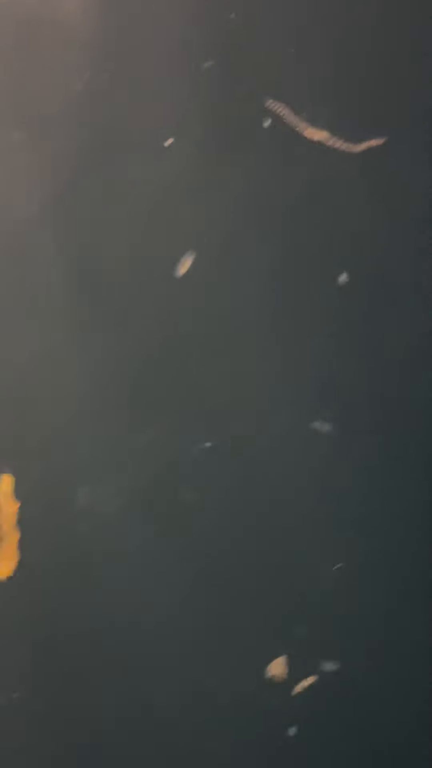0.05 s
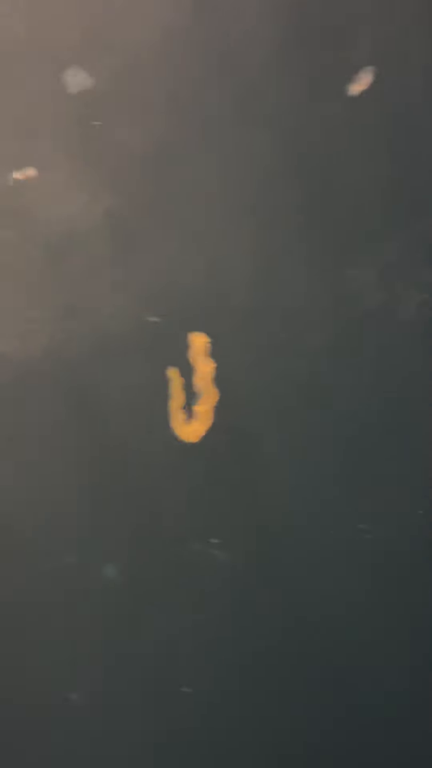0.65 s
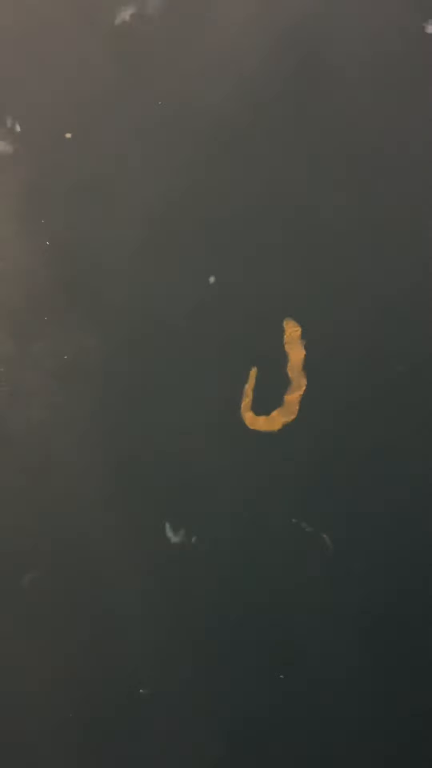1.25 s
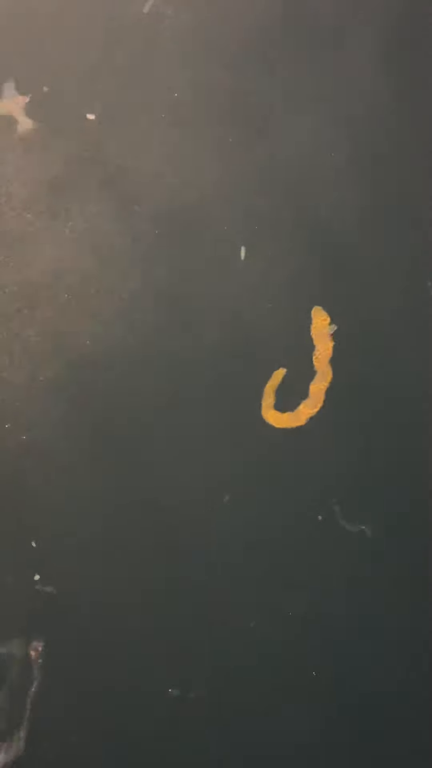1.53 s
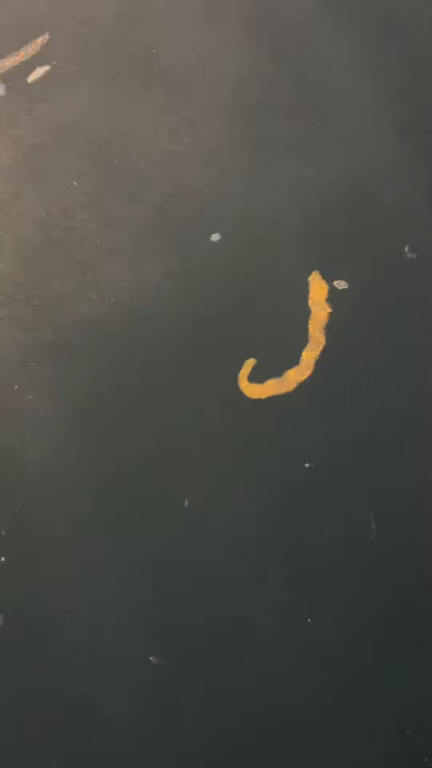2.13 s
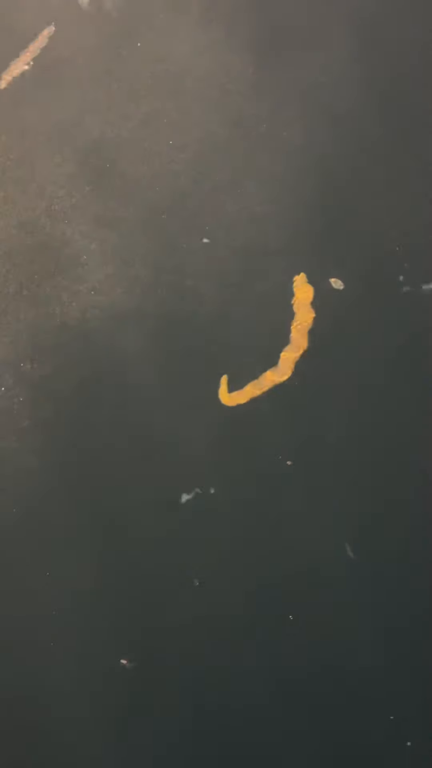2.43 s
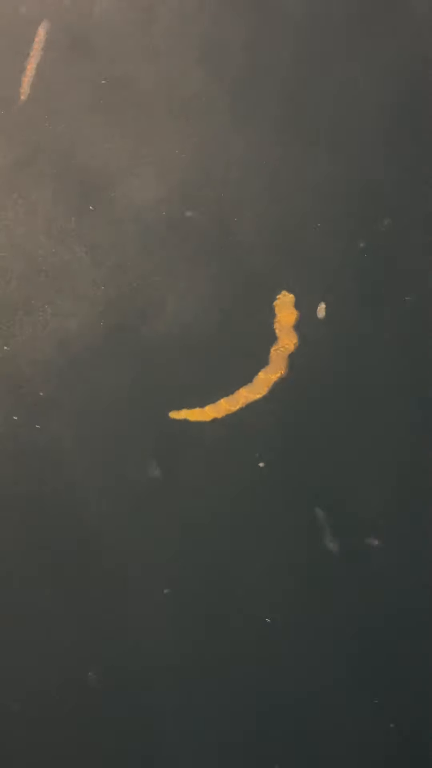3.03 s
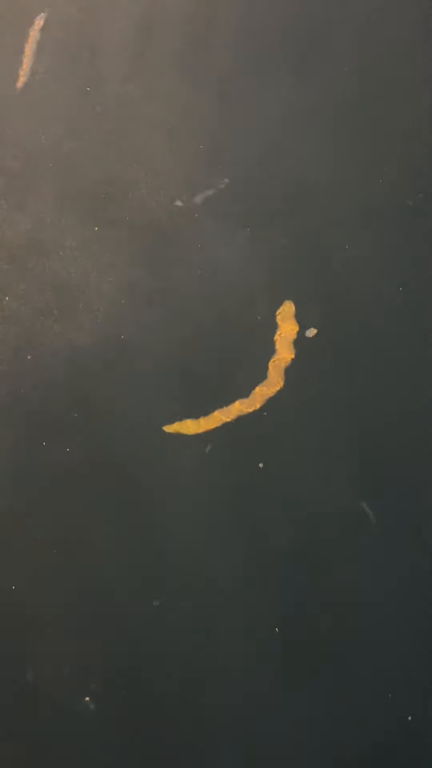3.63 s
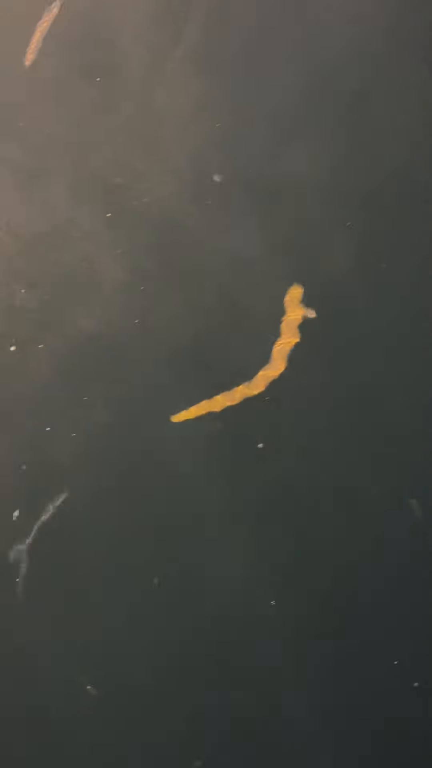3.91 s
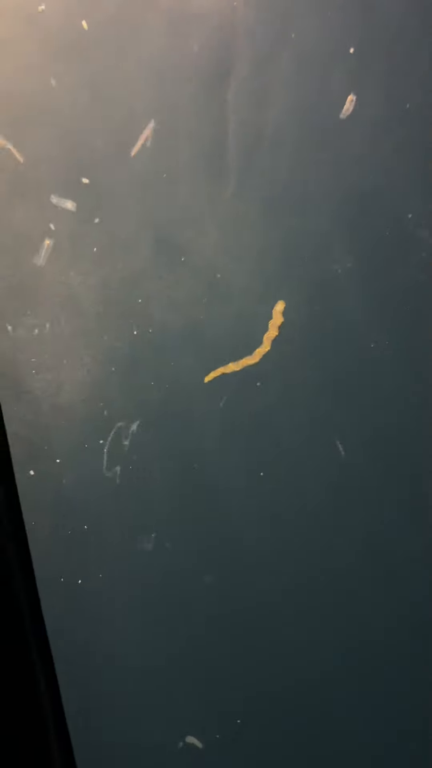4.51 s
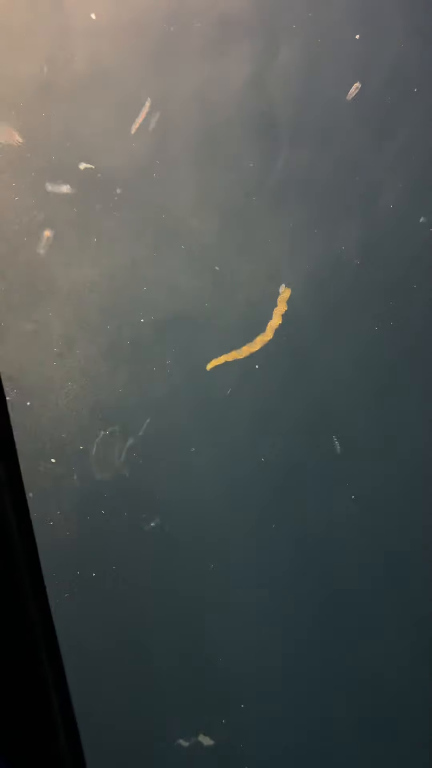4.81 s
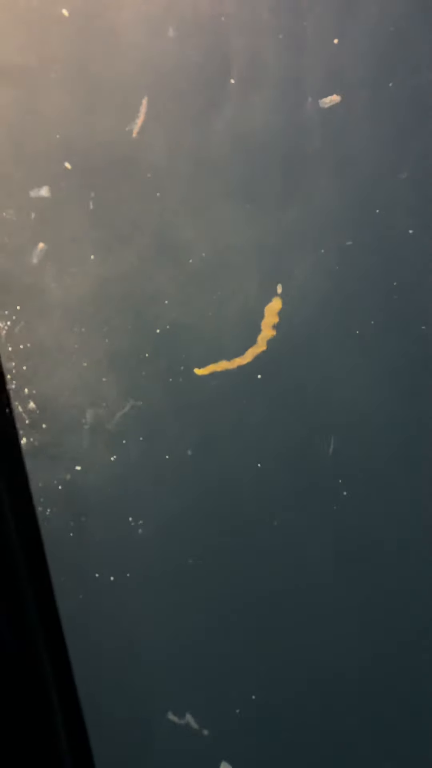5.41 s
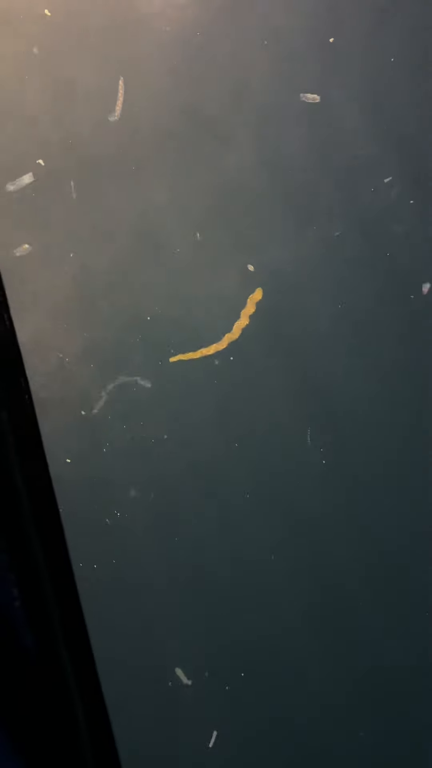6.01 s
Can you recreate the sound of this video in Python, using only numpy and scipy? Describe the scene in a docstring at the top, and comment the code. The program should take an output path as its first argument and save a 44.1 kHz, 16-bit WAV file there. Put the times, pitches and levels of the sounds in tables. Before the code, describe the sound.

The sound is heard underwater, from a microphone hanging beside a boat. A low, steady generator hum and a deep water rumble run throughout. From the start the housing is bumped, making close, dull thumps that fall into a low boom. They crowd together between 0.4 and 1.2 seconds, loudest around 0.7 and 0.9. Another cluster with sharp ticks comes near 1.9, followed by softer thuds until 3 and one more at 3.7. Small bubble gulps and faint rasps appear between them. Around 4.4 seconds a bunch of bumps brings a sharp clack and a deep gulp, and a faint, fine surface hiss opens and stays. A firm knock lands at 4.9, and the bumps end by 5.3. Near 5.9 a faint, thin sizzle slides upward, followed by deep gulps just after 6 seconds over the continuing hum.

```python
"""A microphone in a housing hangs beside a boat at night; the generator hums through the water.
From the start the housing is bumped again and again: each impact rings its low modes in a dull,
falling thump and stirs a rumbling wake. Hard contacts tick, bubbles gulp, brief rasps follow knocks.
After about four seconds a fine hiss opens up near the surface. The bumps stop, and near six seconds
a thin sizzle slides upward, just ahead of the last deep gulps."""
import sys
import numpy as np
from scipy import signal
from scipy.fft import rfft, irfft, next_fast_len
from scipy.io import wavfile
from scipy.ndimage import uniform_filter1d, minimum_filter1d

SR = 44100
rng = np.random.default_rng(int(sys.argv[2]) if len(sys.argv) > 2 else 0)


def wav_out(sig):
    """Save sig, one row per channel (or a flat mono array), as 16-bit PCM at SR to the path in sys.argv[1]."""
    wavfile.write(sys.argv[1], SR, np.round(np.clip(np.atleast_2d(sig).T, -1, 1) * 32767).astype(np.int16))


N = 275845
TIME = np.arange(N) / SR
FFT_SIZE, RING_SIZE = next_fast_len(N + SR // 2), 8192
FREQS = np.maximum(np.fft.rfftfreq(FFT_SIZE, 1 / SR), 1)
RING_FREQS = np.maximum(np.fft.rfftfreq(RING_SIZE, 1 / SR), 1)

# Bumps on the housing: start_s, level_db, hardness_db (extra gain above the bass)
BUMPS = [(0.007, -16.5, 10), (0.37, -17, 2), (0.381, -1.5, -3.5), (0.59, -8.5, -11), (0.682, 5, -0.5),
         (0.726, -6.5, -21.5), (0.860, -13.5, 0.5), (0.867, 6.5, 6.5), (1.002, -8, 2), (1.008, -0.5, -9),
         (1.056, -2, -5.5), (1.163, -1.5, -2), (1.208, -2.5, -4.5), (1.219, -5.5, 1.5), (1.797, -10, -20),
         (1.848, -0.5, -1), (1.877, -4, 0.5), (1.917, -1, 0.5), (2.135, -14.5, -13), (2.253, -5.5, -21.5),
         (2.284, -4, -20.5), (2.339, -10, -19), (2.441, -10.5, -23.5), (2.767, -7.5, -5.5),
         (2.943, -9, -8.5), (3.729, -3.5, -9), (4.135, -13, -23), (4.198, -6.5, -10.5), (4.239, -10, -6.5),
         (4.291, -16, -11), (4.371, -14.5, 12.5), (4.424, 0.5, -18.5), (4.464, -10.5, -2.5),
         (4.888, -4, -2), (4.997, -11, -18), (5.256, -22, -8.5)]


def from_db(db):
    """Decibels to amplitude ratio."""
    return 10 ** (np.asarray(db) / 20)


def unit_rms(x):
    """Scale to unit power."""
    return x / np.sqrt(np.mean(x ** 2) + 1e-20)


def db_at(spectrum, hz):
    """Interpolate a spectrum on a log-frequency axis."""
    known_hz, db = np.transpose(spectrum)
    return np.interp(np.log(hz), np.log(known_hz), db)


def add(track, start_s, sound):
    """Superpose a sound on a track."""
    start = int(np.clip(round(start_s * SR), 0, N - 1))
    track[start:start + len(sound)] += sound[:N - start]


def drift(rate_hz):
    """Slow random fluctuation: low-passed noise of unit power."""
    step, settle = 100, 1000
    pole = np.exp(-2 * np.pi * rate_hz * step / SR)
    white = rng.standard_normal(N // step + settle + 2)
    slow = signal.lfilter([1], [1, -2 * pole, pole * pole], white)[settle:]
    return np.interp(np.arange(N) / step, np.arange(len(slow)), unit_rms(slow))


def noise(spectrum):
    """White noise filtered to a spectrum, at unit power."""
    white = rfft(rng.standard_normal(FFT_SIZE))
    return unit_rms(irfft(white * from_db(db_at(spectrum, FREQS)), FFT_SIZE)[:N])


def ring(colour_db, lag_hz):
    """Minimum-phase impulse response, peak 1; all-pass group delay makes the lows arrive last."""
    cepstrum = irfft(np.log(from_db(colour_db)))
    cepstrum[1:RING_SIZE // 2] *= 2
    cepstrum[RING_SIZE // 2 + 1:] = 0
    response = np.exp(rfft(cepstrum))
    for corner_hz in lag_hz * 2.0 ** np.arange(4):
        response *= (corner_hz - 1j * RING_FREQS) / (corner_hz + 1j * RING_FREQS)
    pulse = irfft(response)
    return pulse / np.abs(pulse).max()


def shelf(low_hz, high_hz):
    """Ramp over log frequency, from 0 at low_hz to 1 at high_hz."""
    return np.clip(np.log(RING_FREQS / low_hz) / np.log(high_hz / low_hz), 0, 1)


def resonance(hz, peak_db, octaves):
    """A bell-shaped resonance peak, in dB."""
    return peak_db / (1 + (np.log2(RING_FREQS / hz) / octaves) ** 2)


def ripple(spread_db):
    """Each point of contact excites the modes differently: a random colour in dB."""
    knots_hz = np.geomspace(100, 12000, 30)
    return np.interp(np.log(RING_FREQS), np.log(knots_hz), rng.normal(0, spread_db, len(knots_hz)))


def ports(x, skew_rad=0.11):
    """Sum and difference at two close ports: alike in the bass, nearly opposed in phase around 800 Hz."""
    # Port difference relative to the sum: frequency_hz, gain_db
    port_difference = [(60, -35), (100, -29.5), (160, -20), (270, -13.5), (440, -3), (720, 13.5),
                       (1190, 9.5), (1950, -3.5), (3200, -1.5), (5300, -7.5)]
    lead = (FFT_SIZE - N) // 2
    padded = np.pad(x, (lead, FFT_SIZE - N - lead), mode="reflect", reflect_type="odd")
    padded *= signal.windows.tukey(FFT_SIZE, lead / FFT_SIZE)
    rotation = -1j * np.exp(1j * skew_rad)   # the skew makes the left port a little louder
    side = irfft(rotation * rfft(padded) * from_db(db_at(port_difference, FREQS)), FFT_SIZE)
    side = side[lead:lead + N]
    return np.array([x + side, x - side])


def water_wash():
    """Broadband wash: a flickering part coherent at both ports, over a steady diffuse field."""
    # Wash spectrum: frequency_hz, density_db
    spectrum = [(300, -1), (600, -1), (1000, -1.5), (1250, 0), (1470, -5.5), (1830, 0), (2300, -17),
                (3000, -22.5), (4200, -43), (9000, -36.5), (14000, -59)]
    coherent = from_db(-62 + 2.5 * drift(rate_hz=24)) * noise(spectrum)
    diffuse = from_db(-63) * np.array([noise(spectrum), noise(spectrum)])
    return ports(coherent) + diffuse


def surface_hiss():
    """Fine hiss of the surface, uncorrelated between left and right."""
    # Hiss spectrum: frequency_hz, density_db
    spectrum = [(900, -21.5), (1750, 4.5), (2300, -1.5), (3000, -5.5), (4300, -8), (5500, -21), (7000, -31),
                (12000, -54.5)]
    # Hiss envelope: time_s, level_db
    levels = [(0, -88), (4.15, -80), (4.35, -59.5), (5.8, -60.5), (5.98, -55.5), (6.25, -60.5)]
    envelope = from_db(np.interp(TIME, *np.transpose(levels)))
    return envelope * np.array([noise(spectrum), noise(spectrum)])


def generator_hum(rate_hz=61.57, wander=0.003, waver_db=2.5):
    """Harmonics of the running rate; each fades in and out as the paths through the water shift."""
    # Harmonic series of the generator: multiple, level_db
    harmonics = [(1, -48), (2, -38.5), (3, -44), (4, -51.5), (5, -46.5), (6, -52), (7, -62), (8, -59.5)]
    phase = 2 * np.pi * np.cumsum(rate_hz * (1 + wander * drift(rate_hz=1.5))) / SR
    hum = np.zeros(N)
    for multiple, db in harmonics:
        amplitude = np.sqrt(2) * from_db(db + waver_db * drift(rate_hz=3.9))
        hum += amplitude * np.sin(multiple * phase + rng.uniform(0, 2 * np.pi))
    return hum


def machinery(waver_db=3.0, gear_hz=1245, gear_db=-73.5):
    """Waterborne machine sound: a noisy drone, the generator's harmonics and a faint steady gear tone."""
    # Drone spectrum: frequency_hz, density_db
    spectrum = [(60, -29), (120, 2.5), (200, 0.5), (330, -5.5), (450, -14), (600, -25), (800, -29.5),
                (1200, -41), (2500, -70), (6000, -92)]
    # Envelope of drone and hum: time_s, level_db
    levels = [(0, -41.5), (1.1, -40.5), (1.45, -37.5), (4.3, -38), (5.4, -42.5), (6.25, -37.5)]
    level_db = np.interp(TIME, *np.transpose(levels))
    drone = from_db(level_db - 1 + waver_db * drift(rate_hz=11)) * noise(spectrum)
    hum = from_db(level_db - np.median(level_db) - 2) * generator_hum()
    whine = np.sqrt(2) * from_db(gear_db) * np.sin(2 * np.pi * gear_hz * TIME)
    return drone + hum + whine


def water_rumble(still_db=-47, wake_db=-40, settle_s=1.1):
    """Flow noise on the housing: still water, each bump's decaying wake and slow surges add in power."""
    # Flow noise spectrum: frequency_hz, density_db
    spectrum = [(12, -28.5), (25, -16.5), (36, 5.5), (56, 15), (75, 5), (100, -1), (160, -20.5),
                (300, -50.5), (1000, -91.5)]
    # Surges of water past the housing: centre_s, half_length_s, level_db
    surges = [(0.76, 0.087, -20), (3.028, .18, -21.5), (3.85, .1, -22), (4.452, 0.27, -26),
              (5.085, .06, -23.5), (5.557, 0.042, -28), (6.028, 0.12, -26.5)]
    stirs = np.zeros(N)
    stirs[[int(start_s * SR) for start_s, _, _ in BUMPS]] = from_db(wake_db) ** 2
    wake_power = signal.lfilter([1], [1, -np.exp(-1 / (settle_s * SR))], stirs)
    surge_power = sum(from_db(db) ** 2 * np.exp(-((TIME - centre_s) / half_s) ** 2)
                      for centre_s, half_s, db in surges)
    return np.sqrt(from_db(STILL_WATER := still_db) ** 2 + wake_power + surge_power) * noise(spectrum)


def sizzle(start_s=5.89, attack_s=0.027, decay_s=0.058, glide_s=0.044, from_hz=2400, to_hz=2870):
    """A thin rasp: narrow-band noise on a rising carrier peaks, then lingers."""
    burst_db, linger_db, half_band_hz = -53.5, -64, 190
    age = np.maximum(TIME - start_s, 0)
    hz = to_hz + (from_hz - to_hz) * np.exp(-age / glide_s)
    phase = 2 * np.pi * np.cumsum(hz) / SR
    attack = np.minimum(age / attack_s, 1)
    envelope = attack * (from_db(burst_db) * np.exp(-age / decay_s) + from_db(linger_db))
    lowpass = signal.butter(2, half_band_hz, fs=SR, output="sos")
    in_phase, quadrature = unit_rms(signal.sosfilt(lowpass, rng.standard_normal((2, N))))
    return envelope * (in_phase * np.cos(phase) + quadrature * np.sin(phase))


def chirp_cloud(half_s, hz, decay_cycles=2.7, rise=0.0049):
    """A cluster of damped oscillators of similar pitch, each rising as it rings."""
    count = int(20 + 2 * half_s * hz)
    spread_octaves = 0.22 * (hz / 1000) ** 0.25   # higher clouds spread wider
    t = np.arange(int(6 * half_s * SR) + RING_SIZE // 4) / SR
    birth, detune, strength = np.clip(rng.standard_normal((count, 3)), -2.5, 2.5).T[:, :, None]
    age = np.maximum(t - half_s * (3 + birth), 0)
    cycles = age * hz * 2 ** (spread_octaves * detune)
    envelope = strength * np.exp(-cycles / decay_cycles) * (1 - np.exp(-2 * cycles))
    cloud = np.sum(envelope * np.sin(2 * np.pi * cycles * (1 + rise * cycles)), axis=0)
    return cloud / np.sqrt(np.sum(cloud ** 2) / (np.e * half_s * SR))


def gulps_and_rasps(gulps_per_s=1.0, gulp_half_s=0.0075, gulp_hz=460, gulp_db=-51):
    """Bubble resonance gives deep gulps in the stirred water; brief fizzy rasps follow knocks."""
    # Gulps (low rows) and rasps (high rows): centre_s, half_length_s, pitch_hz, level_db
    clouds = [(0.146, 0.01, 330, -39.5), (0.716, 0.013, 3400, -63), (0.85, 0.0068, 643, -38.5),
              (0.845, 0.007, 2880, -63), (0.913, 0.0057, 648, -52), (1.865, 0.01, 3620, -54.5),
              (2.284, 0.019, 3030, -68.5), (3.039, 0.013, 361, -37), (3.359, 0.03, 366, -42),
              (3.937, 0.0052, 604, -48), (4.345, 0.012, 330, -31), (4.393, 0.015, 336.4, -22.5),
              (4.425, 0.02, 3900, -53.5), (4.468, 0.012, 4430, -50), (4.514, 0.014, 330, -38.5),
              (5.913, 0.004, 1150, -43.5), (6.064, 0.009, 373, -31), (6.083, 0.027, 247.7, -27)]
    stray_gulps = [(rng.uniform(0, N / SR), gulp_half_s, gulp_hz * 2 ** rng.uniform(-0.19, 0.19),
                    gulp_db + rng.uniform(-8.5, 8.5)) for _ in range(int(gulps_per_s * N / SR))]
    out = np.zeros(N)
    for centre_s, half_s, hz, db in clouds + stray_gulps:
        add(out, centre_s - 3 * half_s - 1 / hz, from_db(db) * chirp_cloud(half_s, hz))
    return out


def ticks(grit=0.14, grit_s=0.0031):
    """Brief hard contacts excite high modes: a gritty snap falls in milliseconds to a hollow clack."""
    # Sharp contacts (the first row is a further clack on the loud bump at 0.381 s): start_s, level_db,
    # brightness_db, hollow_hz, left_over_right_db
    contacts = [(0.387, -26.5, -27.5, 756, 1.5), (1.839, -32, -5.5, 1370, -3),
                (1.876, -23, -3.5, 1005, -6.5), (2.249, -22.5, -20.5, 1017, 1.5),
                (2.339, -24, -14.5, 2080, -1), (2.651, -39.5, -1.5, 1705, 5), (3.389, -40, -28, 636, 3),
                (3.835, -40, -20.5, 1270, 7.5), (4.145, -36.5, -25, 636, 4.5), (4.413, -15, -8.5, 4660, -4),
                (4.417, -14, -7, 1147, 1), (4.577, -36.5, -5.5, 1790, 1.5), (4.845, -42, -13, 1900, 2.5),
                (4.873, -30.5, 1.5, 1780, 1), (4.992, -33.5, 8, 955, 5.5), (5.257, -37, 4, 2440, -1)]
    # Response to a sharp contact: frequency_hz, gain_db
    response = [(150, -26), (350, 4.5), (550, 3.5), (900, -13), (1500, -11.5), (2700, -19.5), (4600, -20),
                (6000, -35.5), (9000, -57), (14000, -64)]
    # A short clack of overload distortion is heard on the loudest thumps.
    delay_s, clack_db, growth, clack_bright_db, clack_hz = 0.0027, -36, 2.1, -20.5, 954
    overload_clacks = [(start_s + delay_s, clack_db + growth * db, clack_bright_db, clack_hz, 0)
                       for start_s, db, _ in BUMPS]
    left, right = np.zeros((2, N))
    treble = shelf(low_hz=900, high_hz=3770)
    t = np.arange(SR // 100) / SR
    for start_s, db, bright_db, hollow_hz, pan_db in contacts + overload_clacks:
        hollow = resonance(hollow_hz, peak_db=11, octaves=0.2)
        colour = db_at(response, RING_FREQS) + bright_db * treble + hollow + ripple(spread_db=3.5)
        snap = (t == 0) + grit * rng.standard_normal(len(t)) * np.exp(-t / grit_s)
        tick = from_db(db) * signal.fftconvolve(ring(colour, lag_hz=460), snap)
        add(left, start_s, tick * from_db(pan_db / 2))
        add(right, start_s, tick * from_db(-pan_db / 2))
    return np.array([ports(left)[0], ports(right)[1]])


def thumps(base_knock_hz=219, hardness_db_per_octave=44):
    """Impacts ring the housing's modes, sweeping from knock to low boom; harder bumps knock higher."""
    # Response of the housing: frequency_hz, gain_db
    housing = [(20, -31), (40, -1), (58, 10), (88, 6), (125, -4), (180, -7), (300, -10.5), (450, -20.5),
               (700, -47.5), (1500, -69.5), (4000, -92.5), (12000, -120)]
    out, upper = np.zeros(N), shelf(low_hz=94.5, high_hz=330)
    for start_s, db, hardness_db in BUMPS:
        knock_hz = base_knock_hz * 2 ** (hardness_db / hardness_db_per_octave)
        knock = resonance(knock_hz, peak_db=9, octaves=1)
        rolloff = -10 * np.log10(1 + (RING_FREQS / (6 * knock_hz)) ** 4)   # contact time limits treble
        colour = db_at(housing, RING_FREQS) + hardness_db * upper + knock + rolloff
        add(out, start_s, from_db(db) * ring(colour + ripple(spread_db=2.5), lag_hz=73.5))
    return out


def scene():
    """Superposition of machinery, water and the impacts on the housing, in stereo."""
    at_housing = machinery() + water_rumble() + sizzle() + gulps_and_rasps() + thumps()
    return water_wash() + surface_hiss() + ports(at_housing) + ticks()


def limiter(x, ceiling):
    """Peak limiting: the gain dips smoothly for milliseconds around any peak above the ceiling."""
    reach = SR // 200
    needed_gain = ceiling / np.maximum(np.abs(x).max(axis=0), ceiling)
    held_gain = minimum_filter1d(needed_gain, 2 * reach + 1)
    return x * uniform_filter1d(uniform_filter1d(held_gain, reach), reach)


def record(dry, bass_hz=400, whine_db=-66, whine_hz=9600, cutoff_hz=15700):
    """Peaks are limited, the bass of heavy thumps modulates a faint thin whine, and the treble is cut."""
    limited = limiter(dry, ceiling=0.95)
    bass = signal.sosfilt(signal.butter(2, bass_hz, fs=SR, output="sos"), limited.mean(axis=0))
    whine = from_db(whine_db) * bass * np.sin(2 * np.pi * whine_hz * TIME)
    return signal.sosfilt(signal.cheby2(12, 70, cutoff_hz, fs=SR, output="sos"), limited + whine)


dry = scene()
out = record(dry)
wav_out(out)
```